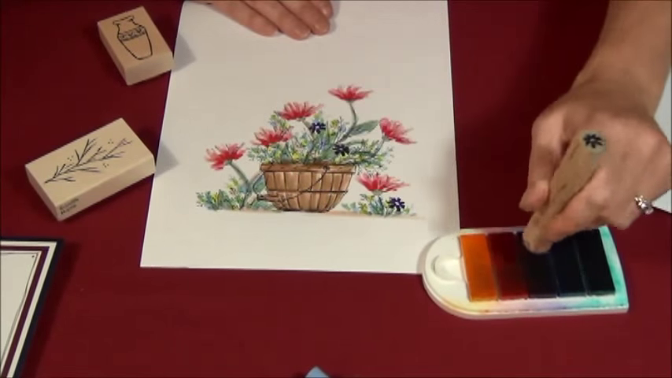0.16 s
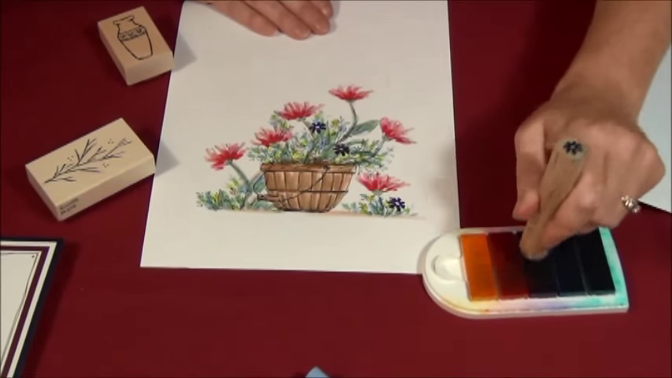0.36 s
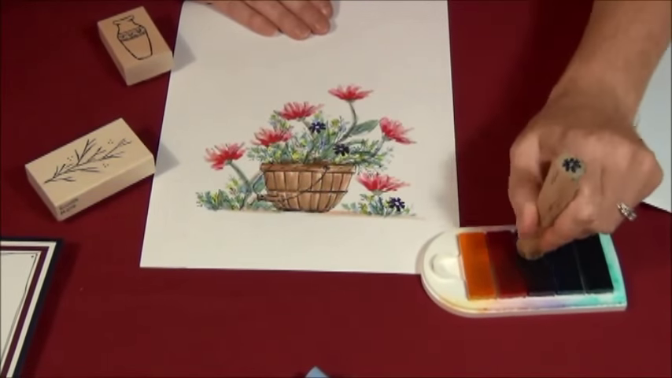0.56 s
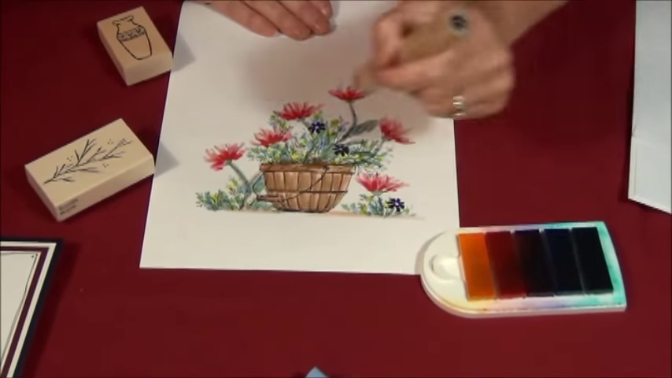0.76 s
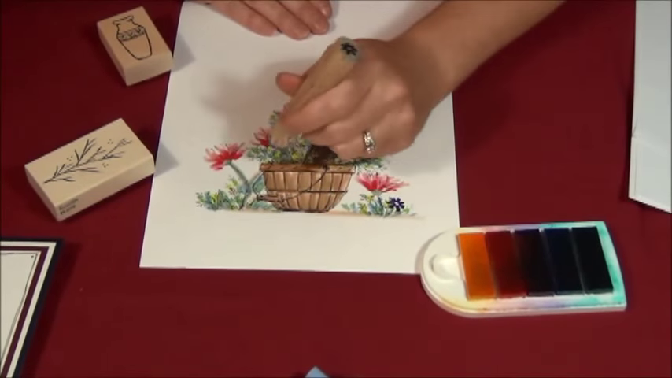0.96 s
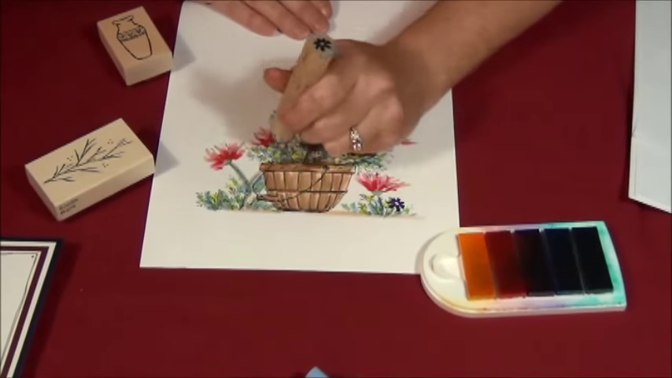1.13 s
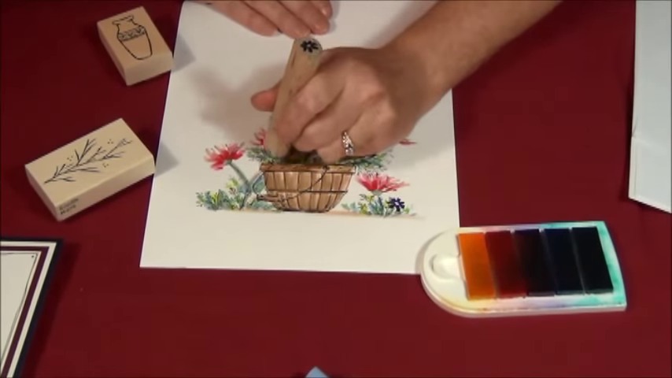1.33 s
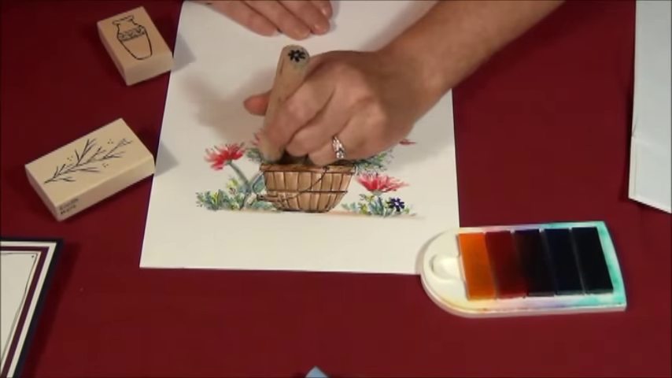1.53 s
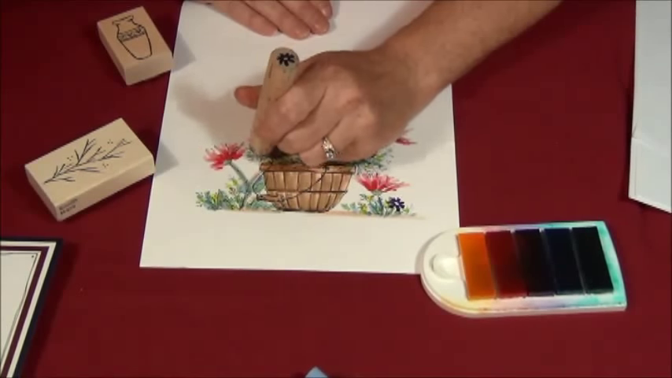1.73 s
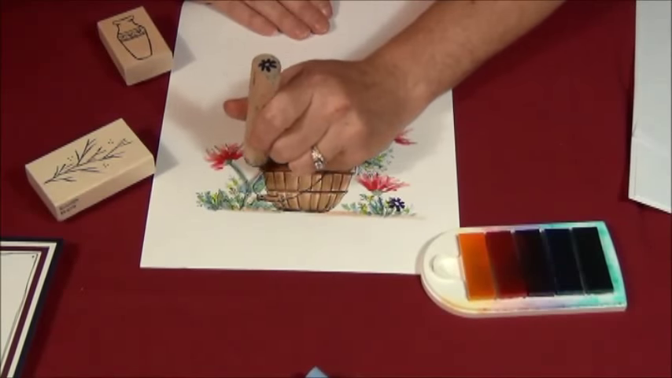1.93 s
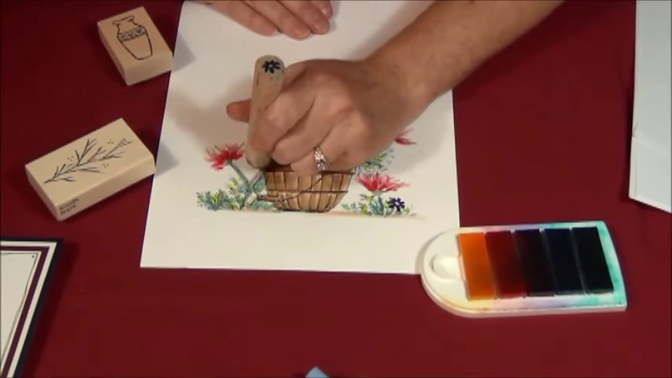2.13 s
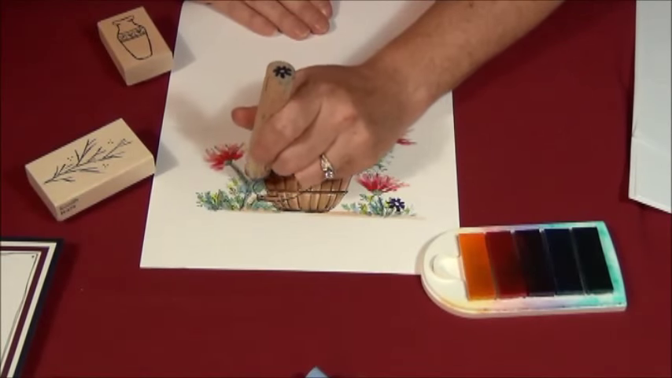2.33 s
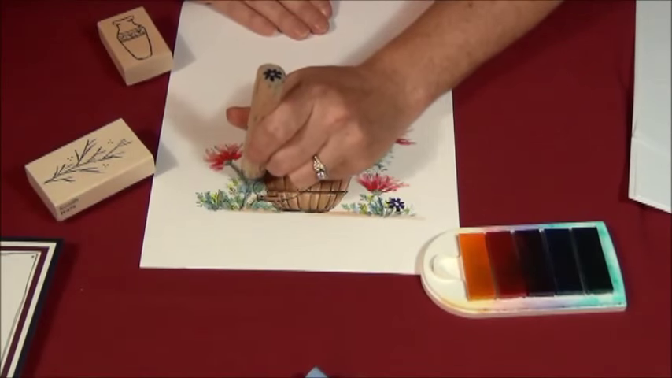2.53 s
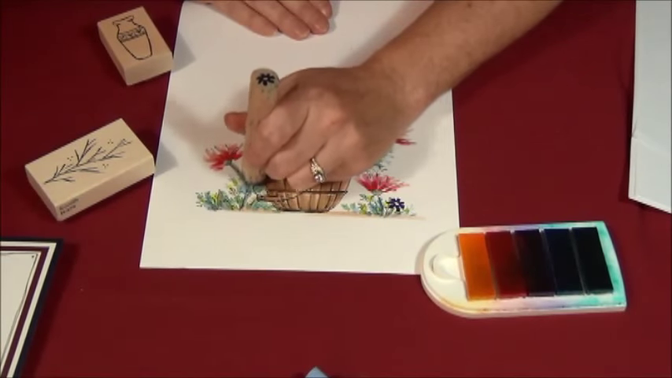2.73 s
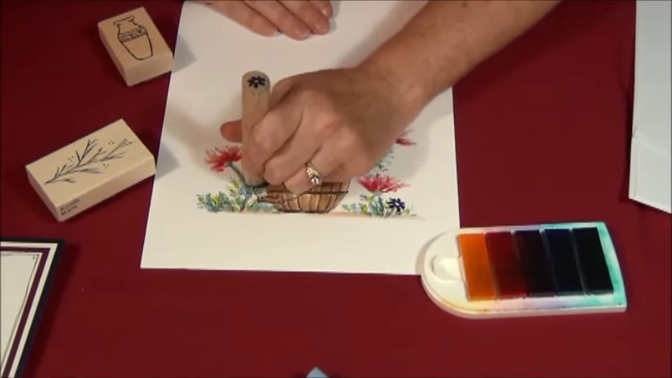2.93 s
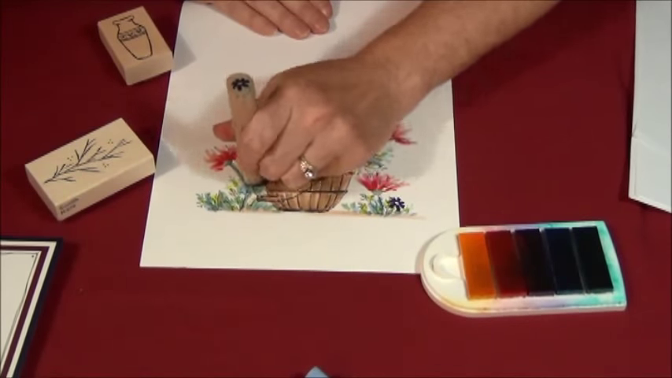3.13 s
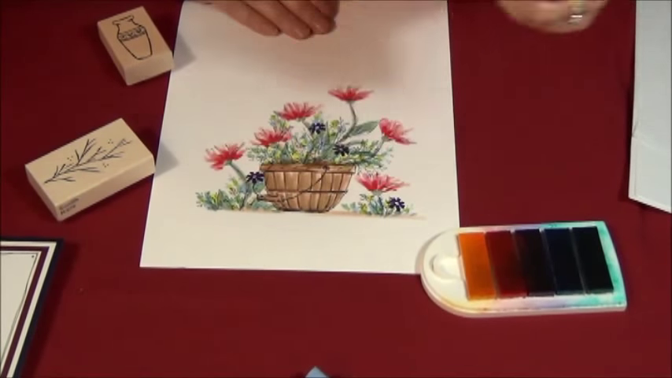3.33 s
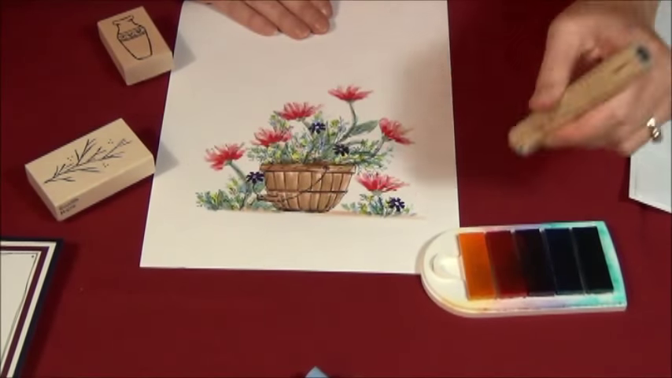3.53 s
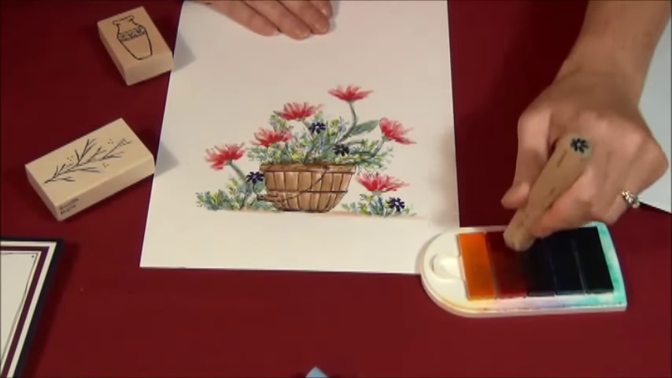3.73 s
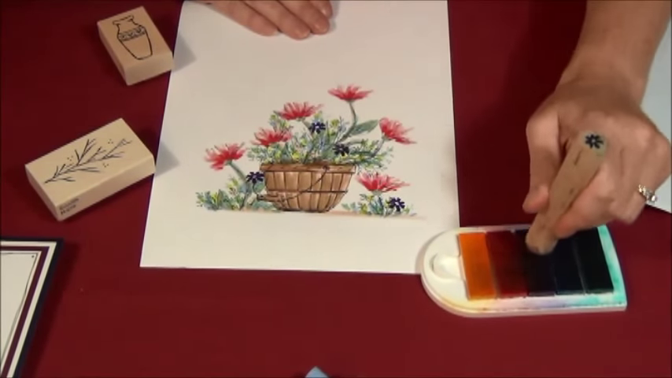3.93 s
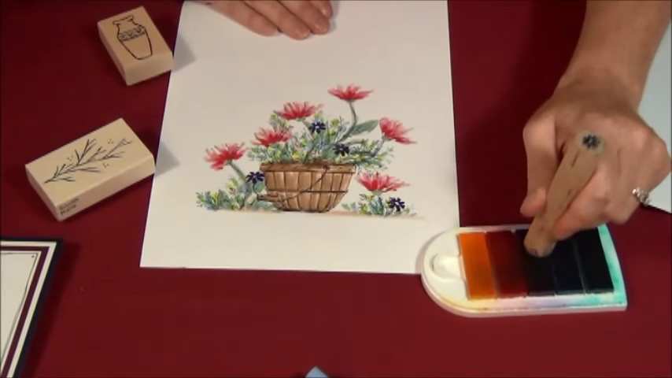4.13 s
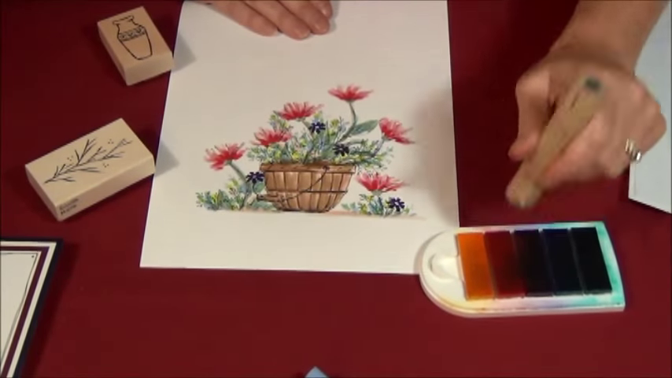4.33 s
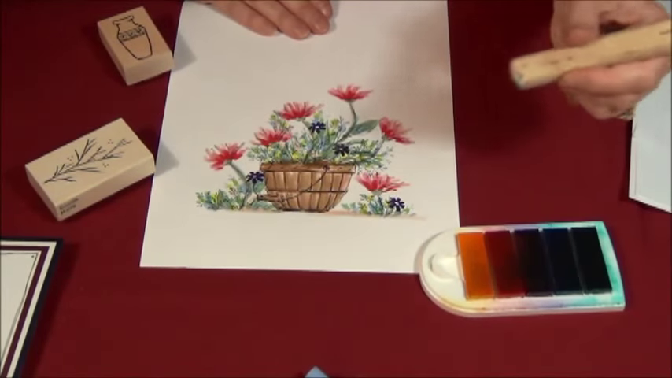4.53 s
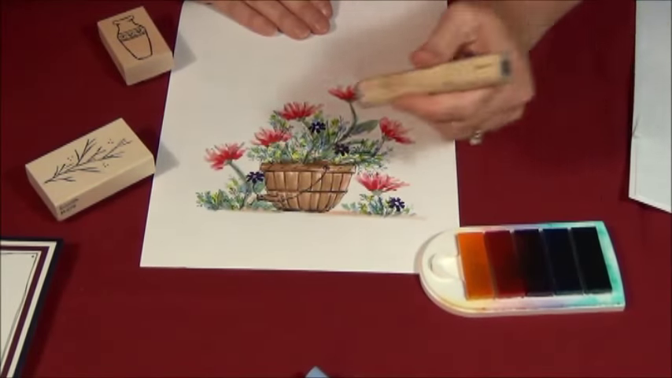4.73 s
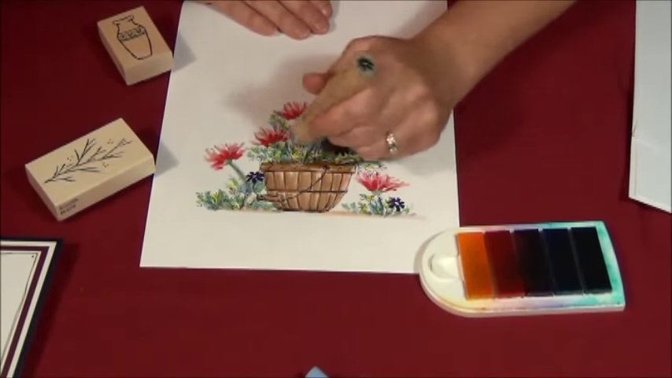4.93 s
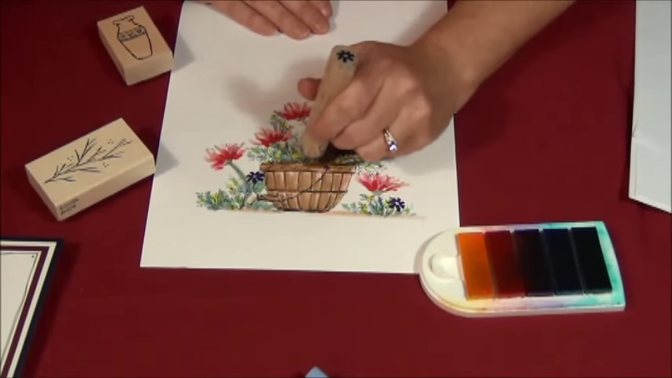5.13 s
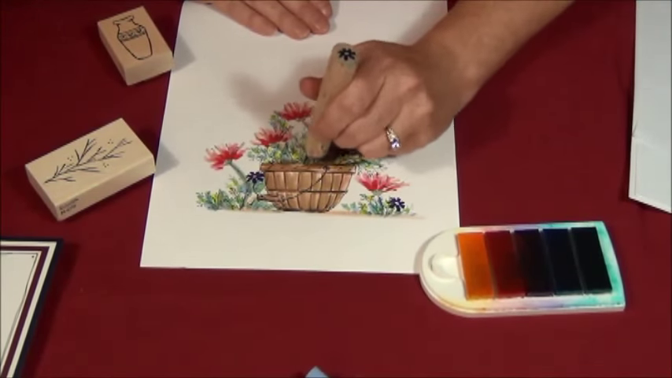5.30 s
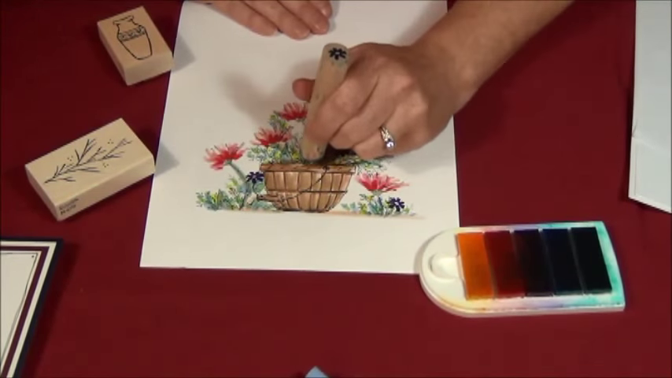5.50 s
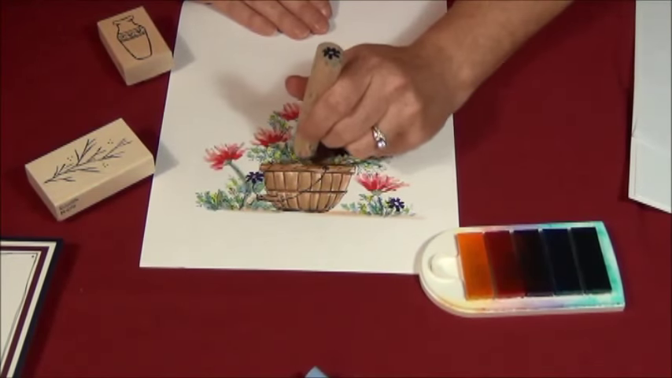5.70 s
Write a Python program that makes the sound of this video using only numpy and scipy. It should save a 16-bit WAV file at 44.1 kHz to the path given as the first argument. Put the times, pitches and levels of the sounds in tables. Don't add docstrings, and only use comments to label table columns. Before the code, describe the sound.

Steady fan hum and hiss in a small room. Two loud plastic clacks come at the start, slightly right, with short table thumps and room reflections. Quiet presses, scuffs and tiny sticky clicks on card come next, then two more clacks near four seconds, and mostly hum to the end. The background dips after the raps and slowly recovers.

```python
import sys
import numpy as np
from scipy import signal
from scipy.fft import rfft, irfft, next_fast_len
from scipy.io import wavfile
from scipy.ndimage import map_coordinates

SR = 44100
rng = np.random.default_rng(int(sys.argv[2]) if len(sys.argv) > 2 else 0)


def master(y):
    cut = np.clip(np.atleast_2d(y).T, -1, 1)
    pcm = np.round(cut * 32767)
    wavfile.write(sys.argv[1], SR, pcm.astype(np.int16))


def gain_from_decibels(decibels):
    exponent = np.asarray(decibels, float) / 20
    return 10 ** exponent


N = 254016

# (time [s], first level [dB], second level [dB], third level [dB], brightness [dB])
ROCKS = [
    (0.3312, -1, -5, -20, -1),
    (0.5224, -7, -1, -4, -3.5),
    (4.0618, -4, -4, -4, 1),
    (4.247, -5.5, 1, -7, -7),
]
# (thump [dB], nearness to the edge [dB], rattle [dB], room drive [dB])
RAPS = [
    (-22.5, 2, -20, 3.5),
    (-20.5, .6, -18, 6.5),
    (-23.5, -13, -19, 0),
    (-25.5, -20, -19, 6),
]
TOUCH_S = .0014


def unit(x):
    return x / np.sqrt(np.mean(x ** 2) + 1e-20)


def along(points, hz):
    f, v = np.transpose(points)
    return np.interp(np.log(hz + 1), np.log(f + 1), v)


def wobble(rate_hz):
    knots = rng.standard_normal(int(N * rate_hz / SR) + 4)
    return map_coordinates(knots, [np.arange(N) * rate_hz / SR])


def filtered(x, response):
    n = x.shape[-1]
    m = next_fast_len(n + 4096)
    return irfft(rfft(x, m) * response(np.fft.rfftfreq(m, 1 / SR)), m)[..., :n]


def noise(size, spectrum):
    return unit(filtered(rng.standard_normal(size), lambda hz: gain_from_decibels(along(spectrum, hz))))


def rush(spectrum):
    # (frequency [Hz], left-right likeness [-1 to 1])
    likeness = [(60, 0.96), (130, 0.96), (290, 0.77), (640, 0.7), (1410, 0.4), (3100, 0.54), (6820, 0.61),
                (15000, 0.86)]

    def mid_side(hz):
        turn = np.arccos(np.clip(along(likeness, hz), -1, 1)) / 2
        return gain_from_decibels(along(spectrum, hz)) * [np.cos(turn), np.sin(turn)]

    mid, side = filtered(rng.standard_normal((2, N)), mid_side)
    return unit(np.array([mid + side, mid - side]))


def add(track, s, x):
    track[round(s * SR):][:len(x)] += x


def ring(t, hz, t60_s, attack_s):
    return gain_from_decibels(-60 * t / t60_s) * np.sin(2 * np.pi * hz * t) * (1 - np.exp(-t / attack_s))


def gain_control():
    ducked = [-4.2, -4, -5.3, -4.5]
    lag_db, lag_s, hold_s, rise_db_per_s, ceiling_db = 0.3, 0.099, 0.59, 2.5, 1.5
    t, gain_db = np.arange(N) / SR, np.zeros(N)
    for (s, *_), ducked_db in zip(ROCKS, ducked):
        since = np.maximum(t - s, 0)
        climb_db = rise_db_per_s * np.maximum(since - hold_s, 0)
        back_db = np.minimum(ducked_db + climb_db, ceiling_db)
        gain_db = np.where(t > s, back_db + lag_db * np.exp(-since / lag_s), gain_db)
    return gain_db


def mains_hum():
    # (multiple of the mains [1], level [dB])
    harmonics = [(1, -14), (2, -4.5), (3, -35), (4, -5), (5, 2), (6, -7), (9, -11), (10, -11)]
    t, mains_hz = np.arange(N) / SR, 60
    return sum(gain_from_decibels(db + 2.3 * wobble(6)) * np.sin(2 * np.pi * (k * mains_hz * t + rng.random()))
               for k, db in harmonics)


def blade_tone():
    # (time [s], level [dB])
    fade = [(0, -2.5), (1.9, -3), (2.4, -14.5), (5.76, -18)]
    t = np.arange(N) / SR
    level_db = np.interp(t, *np.transpose(fade)) + 1.4 * wobble(4.66)
    return gain_from_decibels(level_db) * np.sin(2 * np.pi * 189.5 * t + 1.25 * wobble(3.48))


def fan(gain_db):
    # (frequency [Hz], level [dB per Hz])
    turbulence = [(25, -23), (100, 0.5), (190, 1), (400, 1), (620, -4), (760, 0), (930, 2.5), (1150, -2.5),
                  (1300, -6.5), (2000, -10), (2600, -9), (3150, -6), (3700, -13), (6000, -24)]
    # (frequency [Hz], width [Hz], level [dB])
    duct = [(633, 35, -14.5), (921.5, 19, -12.5), (1120, 54, -15), (3150, 60, -19.5)]
    # (time [s], level [dB])
    airflow = [(0, -0.2), (1.4, 0.1), (1.8, 2), (2.15, 0.2), (3.8, 1.13), (5.3, -.6), (5.76, -0.2)]
    air = gain_from_decibels(-2 + 0.86 * wobble(9)) * rush(turbulence) + gain_from_decibels(-5.0) * (mains_hum() + blade_tone())
    for hz, width_hz, db in duct:
        skirt, half = 3 * width_hz, width_hz / 2
        air += gain_from_decibels(db) * rush([(hz - skirt, -40), (hz - half, -3), (hz, 0), (hz + half, -3), (hz + skirt, -40)])
    level_db = -46.5 + gain_db + np.interp(np.arange(N) / SR, *np.transpose(airflow))
    return gain_from_decibels(level_db) * air


def microphone(gain_db):
    # (frequency [Hz], level [dB per Hz])
    hiss = [(500, 3.5), (3000, 0.5), (8000, -0.5), (15500, -3)]
    t, scan_hz, beat_hz = np.arange(N) / SR, 15734.3, 12.93
    twin = -.65 * np.sin(2 * np.pi * (scan_hz * t + beat_hz * (t - 1.1)))
    whistle = gain_from_decibels(-11) * (np.sin(2 * np.pi * scan_hz * t) + twin)
    return gain_from_decibels(-54.5 + gain_db) * (gain_from_decibels(3.5) * rush(hiss) + whistle)


def contacts():
    # (time [s], peak level [dB])
    snaps = [
        (0.3375, -7),
        (0.5289, -11),
        (4.0679, -7.5),
        (4.2536, -8.5),
    ]
    # (time [s], peak level [dB])
    lifts = [(.605, -39), (.612, -35), (.65, -31.5), (4.153, -31.5), (4.3124, -36), (4.337, -29),
             (4.351, -29)]
    knock_gap_s, snap_bright_db, lift_bright_db = .0027, 11, -13
    touches = []
    for s, *dbs, bright_db in ROCKS:
        touches += [(s + k * knock_gap_s, db, bright_db) for k, db in enumerate(dbs)]
    touches += [(s, db, snap_bright_db) for s, db in snaps]
    return touches + [(s, db, lift_bright_db) for s, db in lifts]


def pad_case():
    # (frequency [Hz], level [dB], t60 [s], share of brightness [0-1])
    case_modes = [(2930, -20, 0.0091, 0.19), (3110, -6.5, 0.014, 0.97), (3550, -0.5, 0.016, 0),
                  (4080, -8, 0.013, 0.71), (5200, 1.5, 0.0038, 0), (6220, -1, 0.0039, 1),
                  (8000, 4, 0.0054, 0.52), (10720, 0, 0.003, 1)]
    echo_s, echo_db, echo_hz = .01, -10.5, 5000
    out, t = np.zeros((2, N + SR)), np.arange(SR // 20) / SR
    for s, db, bright_db in contacts():
        luck = rng.standard_normal((len(case_modes), 2))
        modes = sum(gain_from_decibels(level + share * bright_db + 2 * a) * ring(t, hz * (1 + 0.051 * b), t60, 4e-5)
                    for (hz, level, t60, share), (a, b) in zip(case_modes, luck))
        colour = [(800, -45), (3500, 1.5), (6000, bright_db / 2), (11000, bright_db - 3.0),
                  (13500, bright_db - 14), (16500, bright_db - 19)]
        for side in out:
            add(side, s, gain_from_decibels(db - 12.5 - 60 * t / 0.004) * noise(len(t), colour))
        crack = gain_from_decibels(db - 26) * unit(gain_from_decibels(-60 * t / 0.015) * noise(len(t), colour))
        add(out.T, s, (crack - gain_from_decibels(db - 10.5) * modes)[:, None])
    echo = filtered(out[:, :N], lambda hz: 1j * hz / (echo_hz + 1j * hz))
    add(out.T, echo_s, gain_from_decibels(echo_db) * echo.T)
    return out[:, :N]


def table_top():
    # (frequency [Hz], level [dB], t60 [s], group [0 low, 1 middle, 2 upper])
    table_modes = [(129.3, 5, 0.076, 0), (153, -1.5, 0.065, 0), (255, -5, 0.13, 1), (330, 5, 0.069, 1),
                   (447, -6.5, 0.093, 1), (624, -8.5, 0.09, 2), (942, 1, 0.033, 2), (1270, 1.5, 0.042, 2),
                   (1405, -13, 0.1, 2)]
    # (frequency [Hz], level [dB per Hz])
    rattle_colour = [(240, -63), (400, 0), (781, -9.5), (1430, -6), (1750, -14.5), (3940, -5.5),
                     (12100, -15), (15700, -32), (16500, -53)]
    out, t = np.zeros(N + SR), np.arange(SR // 4) / SR
    for (knock_s, *_), (thump_db, upper_db, rattle_db, _) in zip(ROCKS, RAPS):
        group_db = (0, -2.5 - 0.33 * upper_db, upper_db)
        luck = rng.standard_normal(len(table_modes))
        thump = sum(gain_from_decibels(level + group_db[group]) * ring(t, hz * (1 + 0.034 * b), t60, 0.0069)
                    for (hz, level, t60, group), b in zip(table_modes, luck))
        rattle = noise(len(t), rattle_colour) * gain_from_decibels(-60 * t / 0.091) * (1 - np.exp(-(t / 0.0015) ** 2))
        add(out, knock_s - TOUCH_S, gain_from_decibels(thump_db + 1.5) * thump)
        add(out, knock_s, gain_from_decibels(rattle_db) * rattle)
    return out[:N]


def case_to_walls():
    # (frequency [Hz], level [dB per Hz])
    wall_colour = [(200, -32), (500, -4), (1300, -15), (1900, 0.5), (3500, 3.5), (6500, -1.5), (11000, -10),
                   (14000, -23), (16500, -30)]
    pulses = np.zeros(N)
    for (knock_s, *_), (*_, drive_db) in zip(ROCKS, RAPS):
        pulses[round((knock_s - TOUCH_S) * SR)] = gain_from_decibels(drive_db + 10)
    return filtered(pulses, lambda hz: gain_from_decibels(along(wall_colour, hz)))


def room(x):
    # (frequency [Hz], t60 [s])
    room_t60 = [(150, 0.32), (1000, 0.35), (3000, 0.32), (8000, 0.26), (12000, 0.27), (15500, 0.1)]
    out, step = np.zeros((2, N + SR)), SR // 5
    for start in range(0, N, step):
        piece = x[start:start + step]
        if np.abs(piece).max() < 1e-5:
            continue
        common, apart = rng.standard_normal(SR // 2), rng.standard_normal((2, SR // 2))
        hz, t, z = signal.stft(common + 0.69 * apart, SR, nperseg=256)
        own = np.clip(hz / 900, .2, 1)[:, None]
        z[1] = z[1] * own + z[0] * (1 - own)
        decay = gain_from_decibels(-60 * t / along(room_t60, hz)[:, None])
        tail = signal.istft(z * decay, SR, nperseg=256)[1]
        wet = signal.fftconvolve(piece[None], tail / np.linalg.norm(tail[0]), axes=1)
        out[:, start + 300:][:, :wet.shape[1]] += wet
    return out[:, :N]


def table_legs():
    # (time [s], level [dB])
    sways = [(.36, -51), (.56, -44), (2.03, -51), (2.88, -54), (3.24, -53), (4.1, -54), (4.29, -51)]
    out, t = np.zeros(N + SR), np.arange(SR // 3) / SR
    for s, db in sways:
        add(out, s, gain_from_decibels(db + 13.5) * ring(t, 35, 0.23, 0.053))
    return out[:N]


def stamp_knocks():
    # (time [s], level [dB], pitch [Hz])
    pings = [
        (.561, -31, 1410),
        (.603, -39, 1510),
        (3.242, -36, 2790),
        (4.311, -34.5, 1400),
    ]
    # (time [s], level [dB], body pitch [Hz], snap [dB])
    presses = [(2.0288, -31, 274, -12.5), (2.03, -31, 168, -30), (2.032, -31.5, 674, -23),
               (2.0783, -36.5, 737, -2.5), (2.087, -31, 321, -20), (2.09, -32.5, 512, -20),
               (2.2555, -39, 466, -3.5), (2.265, -36.5, 435, -20), (2.6792, -35, 500, -4.5),
               (2.9205, -31, 255, -28), (3.255, -42, 408, -15), (3.365, -34, 330, -8.5),
               (3.686, -25, 256, -19), (3.72, -32.5, 244, -23), (3.75, -38, 256, -22)]
    ping_snap_db = -23
    out, t = np.zeros(N + SR), np.arange(SR // 4) / SR
    for s, db, hz, snap_db in presses + [(*ping, ping_snap_db) for ping in pings]:
        t60_s = 0.18 * (hz / 300) ** -0.57
        body = noise(len(t), [(hz / 4, -26), (hz * 0.37, -3), (hz, 0), (hz * 1.4, -7),
                              (hz * 3.03, -15), (hz * 9, -36)])
        knock = 0.47 * body * gain_from_decibels(-60 * t / t60_s) * (1 - np.exp(-t / 0.002))
        knock += 0.75 * ring(t, hz, t60_s * 0.7, 0.00081)
        knock += 0.65 * ring(t, hz * 1.24, t60_s * 0.65, 0.0012)
        snap = noise(len(t), [(300, 0), (900, -4.0), (1900, -5.5), (2600, -10.0), (12000, -26.0)])
        snap *= gain_from_decibels(snap_db + 3 - 60 * t / 0.048)
        edge = gain_from_decibels(snap_db + 7.0) * (ring(t, 1440, 0.0094, 1e-4) + ring(t, 770, 0.023, 1e-4))
        add(out, s, gain_from_decibels(db) * (knock + snap + edge))
    return out[:N]


def scuffs():
    # (time [s], length [s], level [dB], centre [Hz])
    brushes = [
        (.92, 0.048, -54.5, 8000),
        (1.78, .17, -54, 430),
        (1.81, 0.035, -53, 7000),
        (2.846, 0.013, -47, 3400),
        (5.22, 0.12, -54, 5940),
    ]
    out = np.zeros(N + SR)
    for s, length_s, db, hz in brushes:
        u = np.arange(round(2 * length_s * SR)) / SR / length_s - 1
        swell = np.cos(np.pi * u / 2) ** 2
        add(out, s - length_s, gain_from_decibels(db) * swell * noise(len(u), [(hz / 4, -14), (hz, 0), (hz * 2, -4)]))
    return out[:N]


def ink_ticks():
    # (time [s], peak level [dB])
    releases = [(1.791, -51), (1.987, -35.5), (2.843, -40), (2.921, -50), (3.1102, -33), (3.1135, -42),
                (3.2318, -32), (3.2359, -23.5), (3.2392, -19), (3.248, -46), (3.259, -46), (4.8645, -42)]
    # (frequency [Hz], level [dB per Hz])
    ink_colour = [(500, -28), (1200, -9), (2700, 4), (4500, 4), (6500, -5.5), (10500, 1), (13000, -2),
                  (15500, -24)]
    out, t = np.zeros(N + SR), np.arange(SR // 4) / SR
    for s, db in releases:
        out[round(s * SR)] = -gain_from_decibels(db + 14.5)
        add(out, s, gain_from_decibels(db - 9 - 60 * t / .007) * rng.standard_normal(len(t)))
    return filtered(out, lambda hz: gain_from_decibels(along(ink_colour, hz)))[:N]


def scene():
    gain_db = gain_control()
    background = fan(gain_db) + microphone(gain_db)
    case, wood = pad_case(), table_top()
    card = stamp_knocks() + scuffs() + ink_ticks()
    dull_card = filtered(card, lambda hz: 1 / (1 + (1j * hz / 5000)))
    to_room = gain_from_decibels(-10.5) * case_to_walls() + gain_from_decibels(-10.0) * wood + gain_from_decibels(-8.5) * dull_card
    right = gain_from_decibels([[-.9], [.9]])
    near = case * right + wood + card + room(to_room)
    near = filtered(near, lambda hz: (1j * hz / (80 + 1j * hz)) ** 3)
    return near + table_legs() + background


def top_cut(x):
    return signal.sosfilt(signal.butter(12, 17130, fs=SR, output="sos"), x)


def record(dry):
    top_hz = 15770
    clipped = np.clip(dry, -.82, .82)
    kept = filtered(clipped, lambda hz: np.where(hz < top_hz, 1, gain_from_decibels(-36 - (hz - top_hz) / 40)))
    return top_cut(kept)


dry = scene()
out = record(dry)
master(out)
```